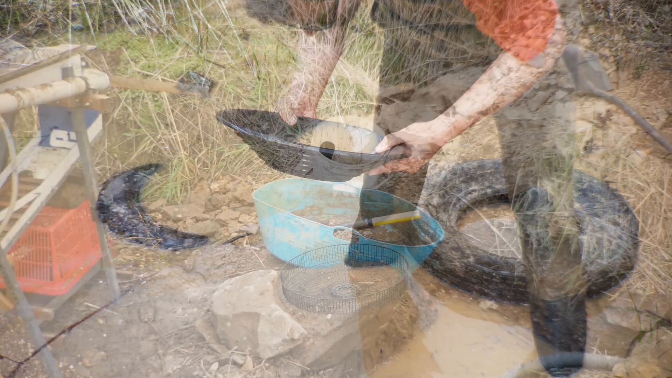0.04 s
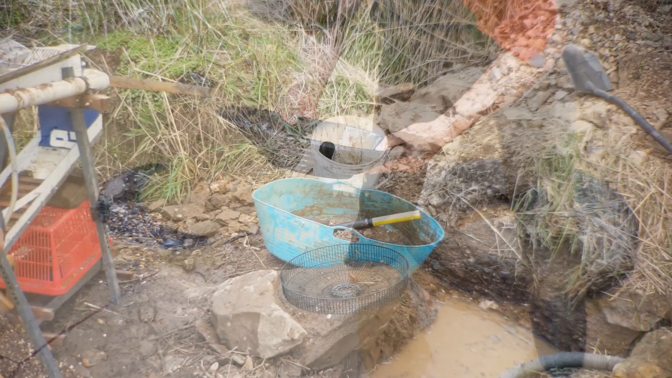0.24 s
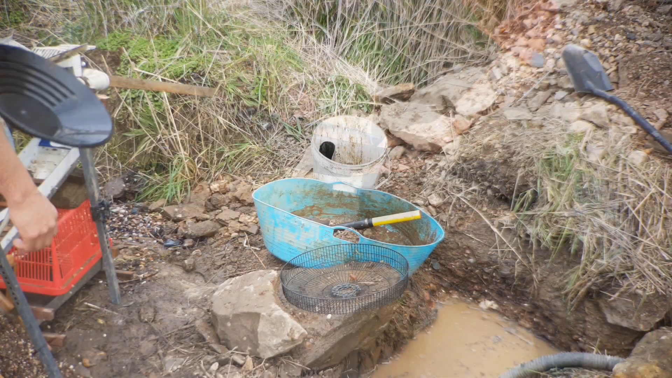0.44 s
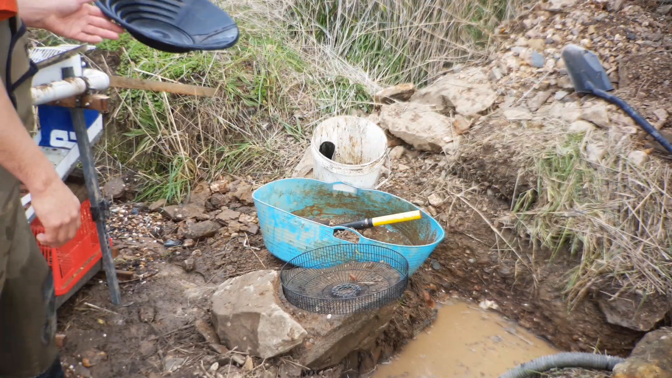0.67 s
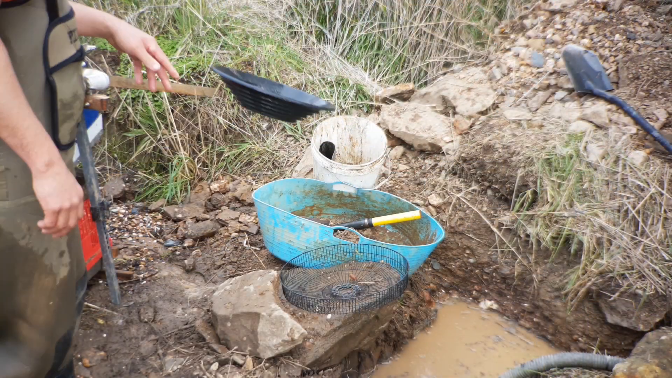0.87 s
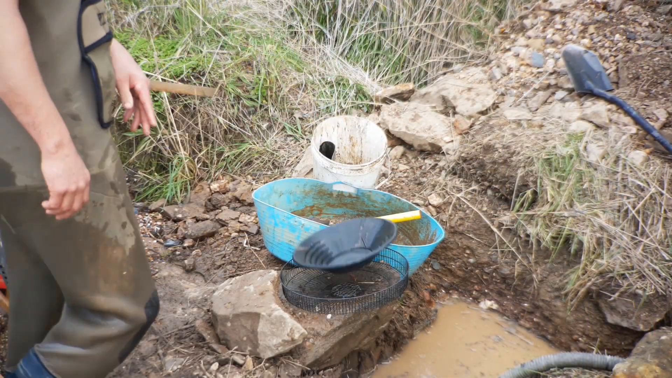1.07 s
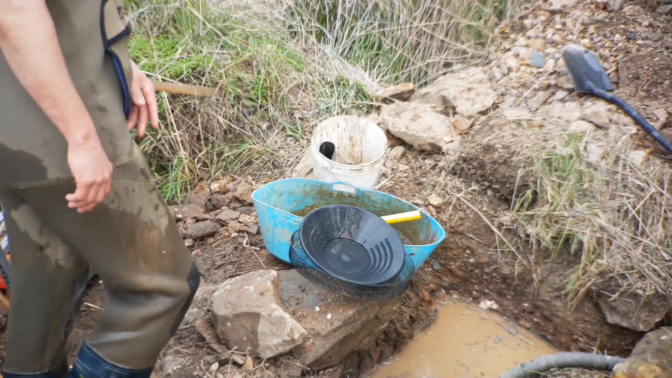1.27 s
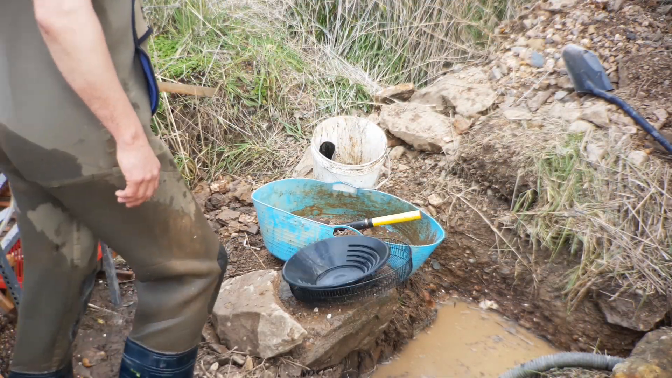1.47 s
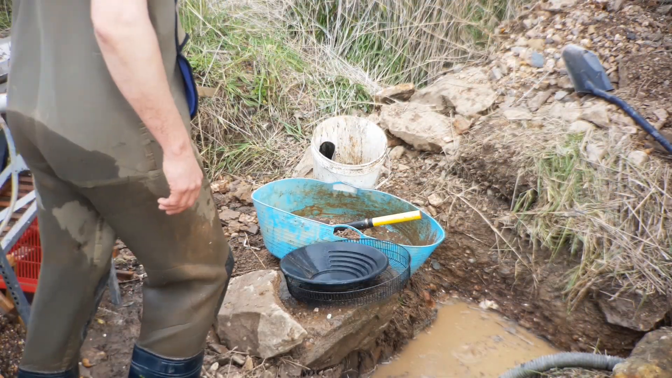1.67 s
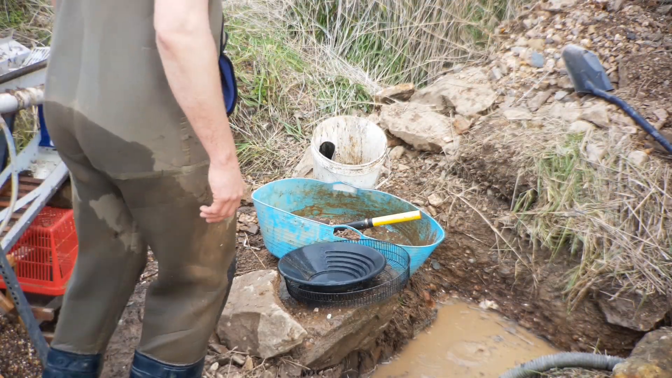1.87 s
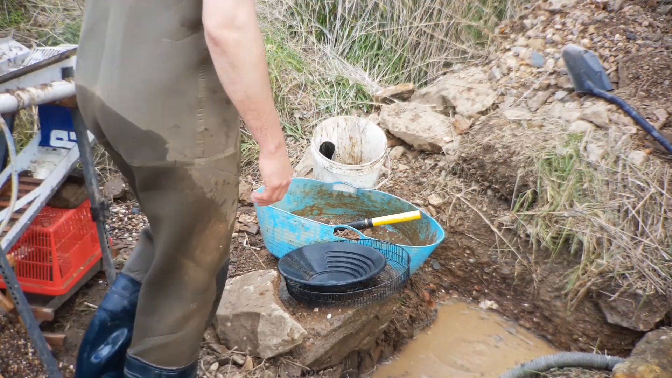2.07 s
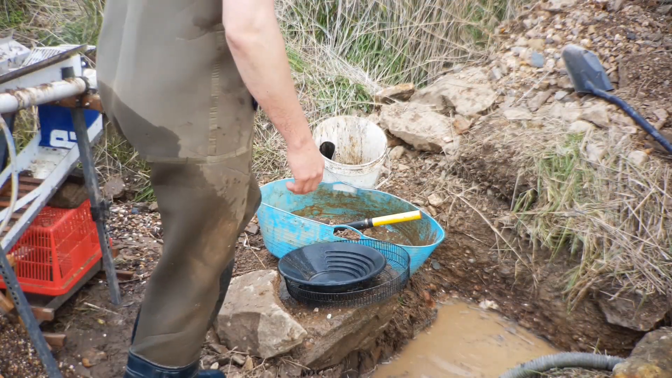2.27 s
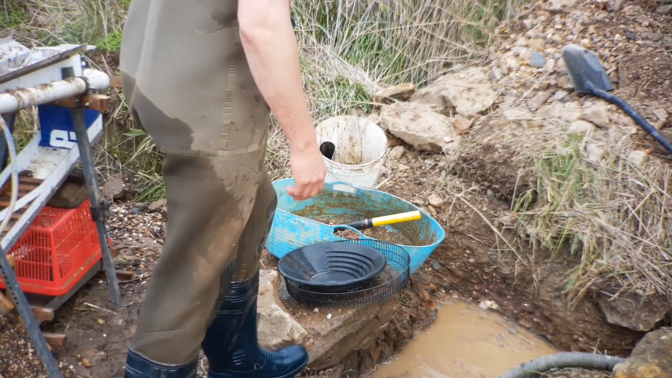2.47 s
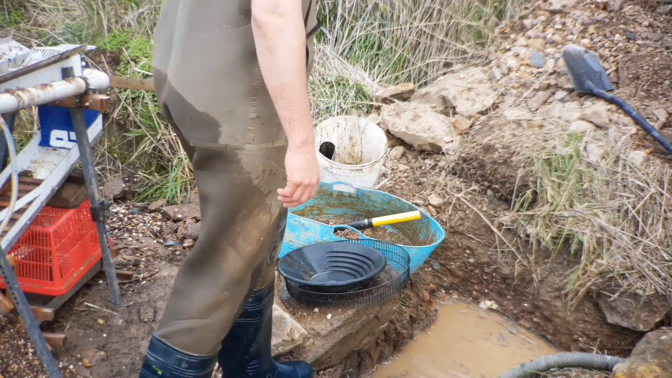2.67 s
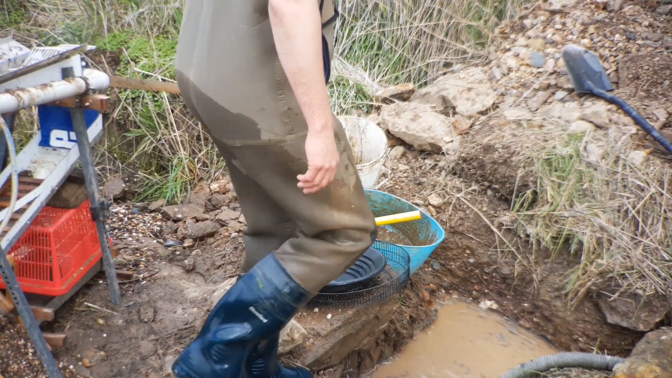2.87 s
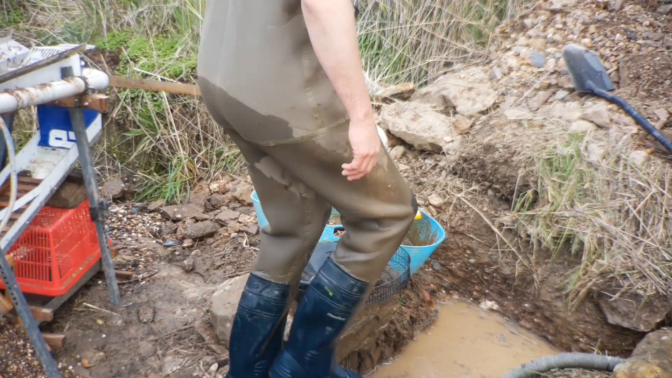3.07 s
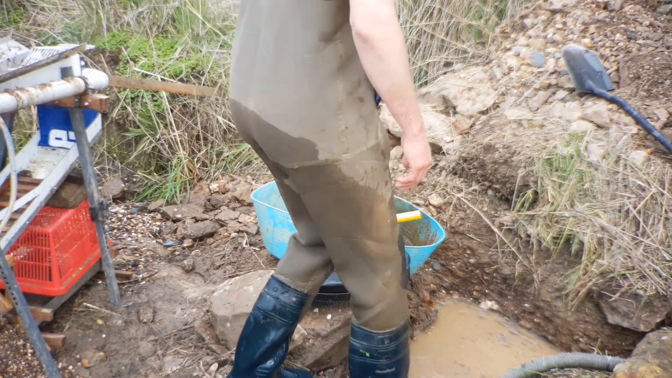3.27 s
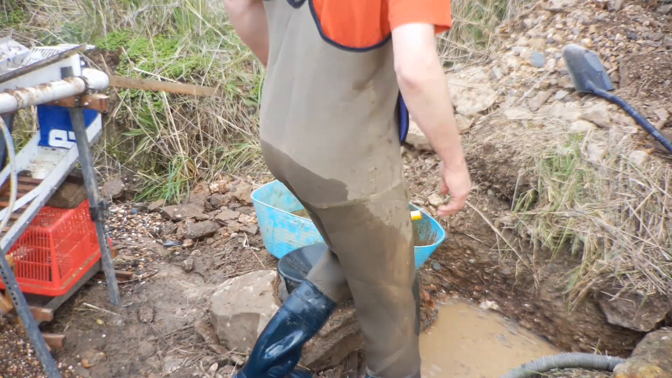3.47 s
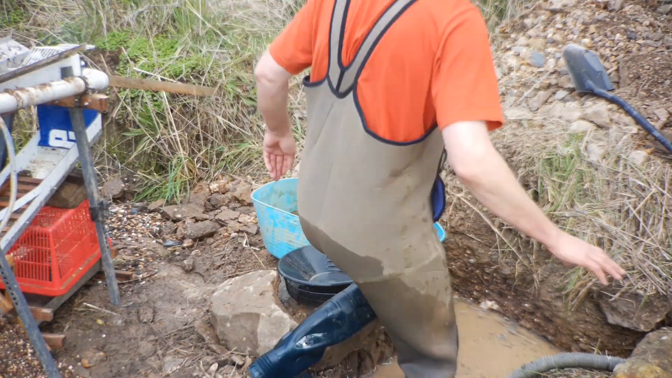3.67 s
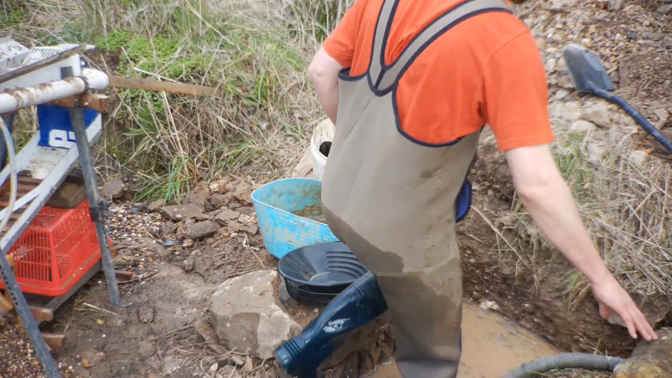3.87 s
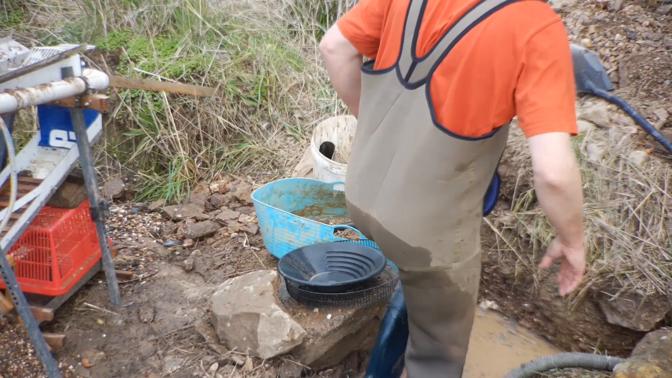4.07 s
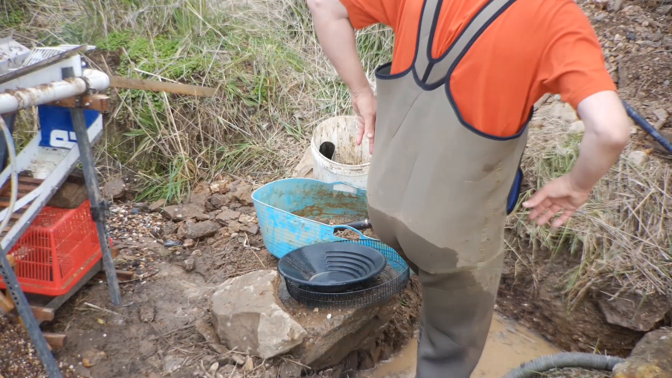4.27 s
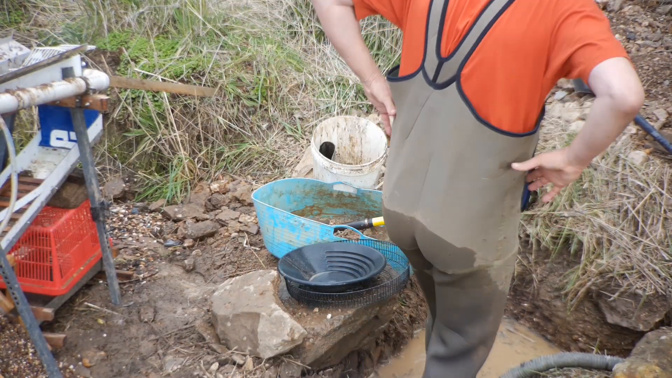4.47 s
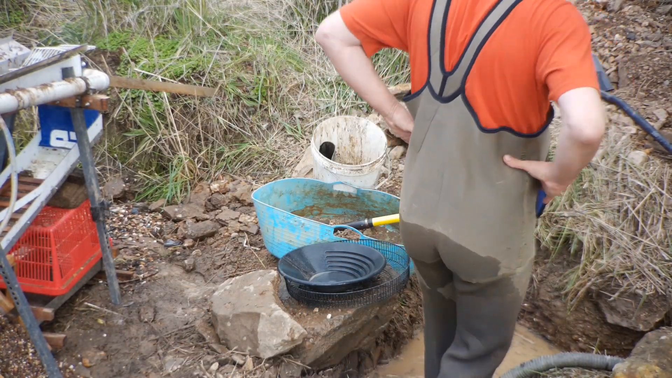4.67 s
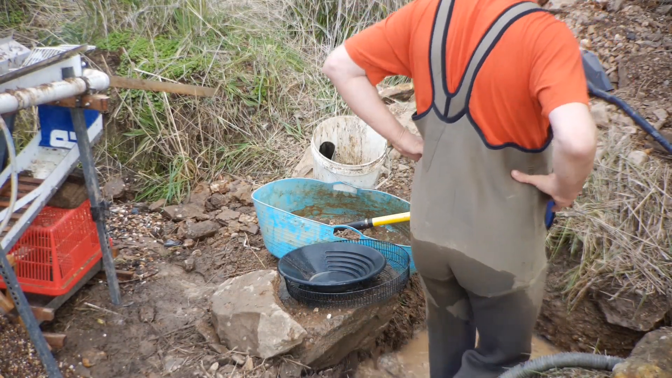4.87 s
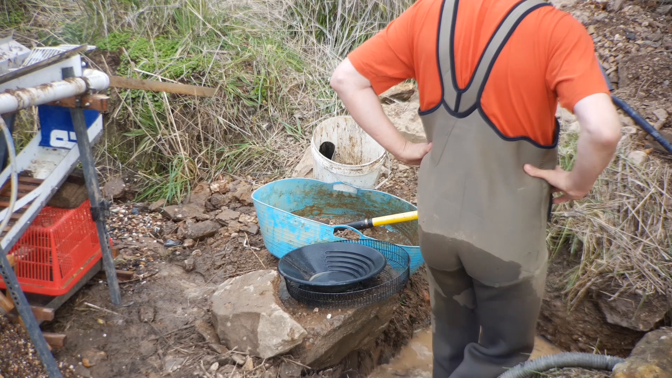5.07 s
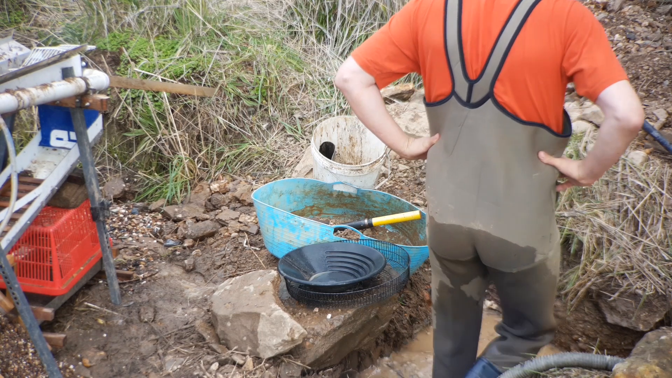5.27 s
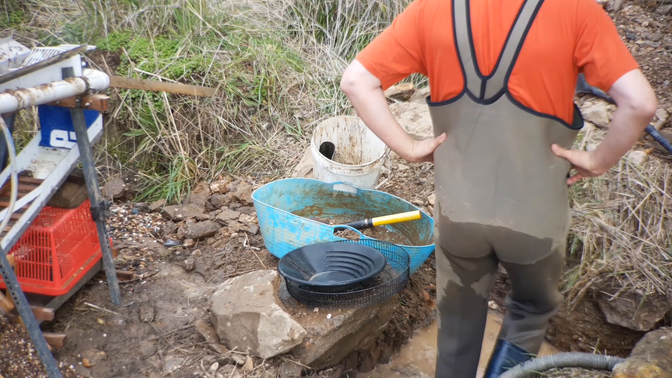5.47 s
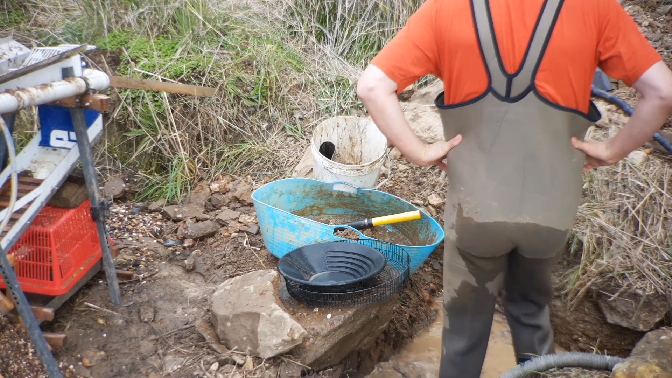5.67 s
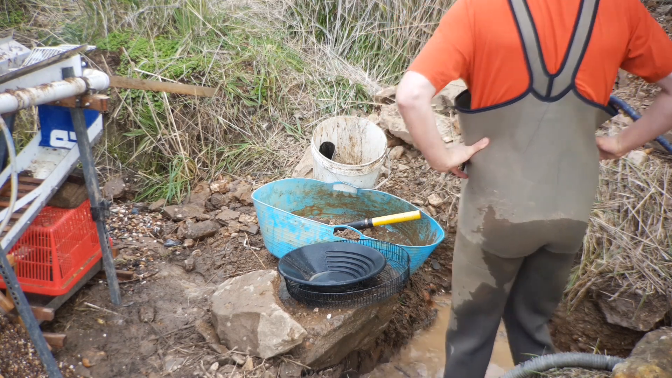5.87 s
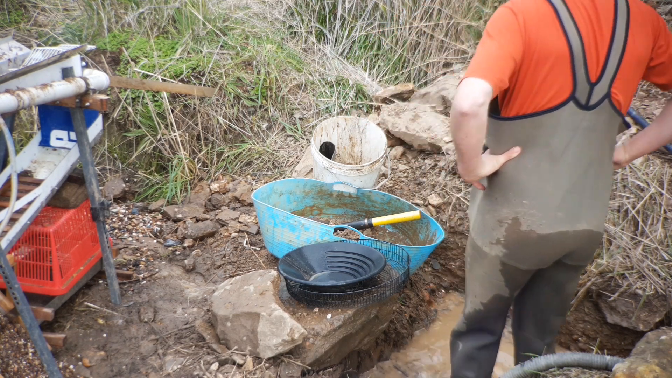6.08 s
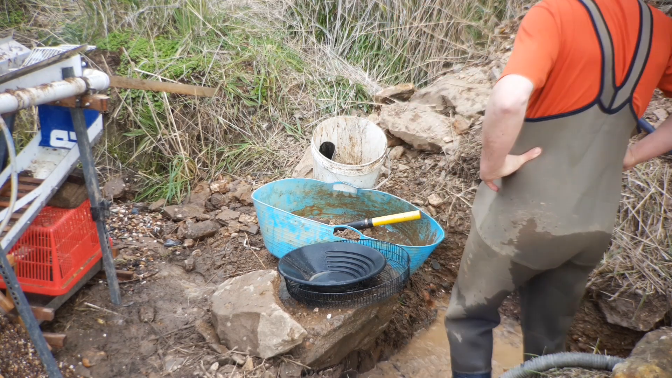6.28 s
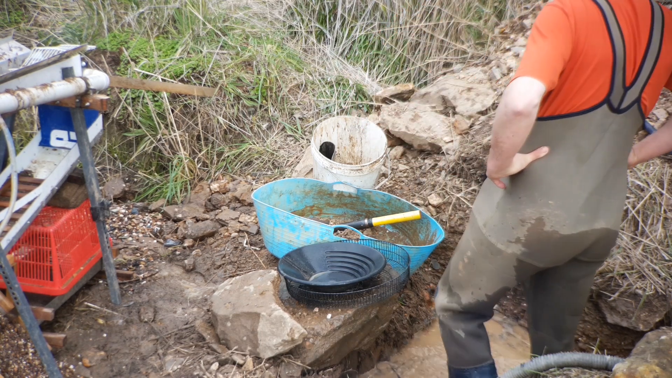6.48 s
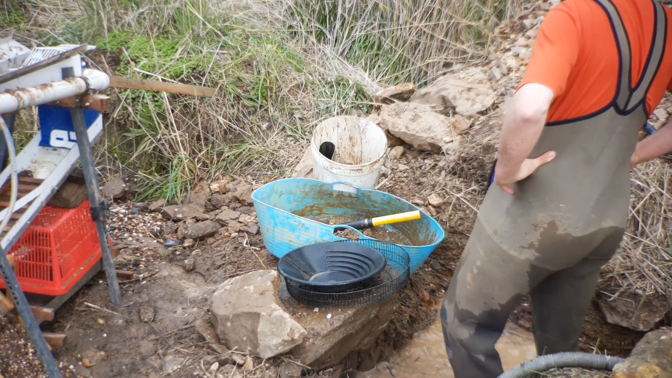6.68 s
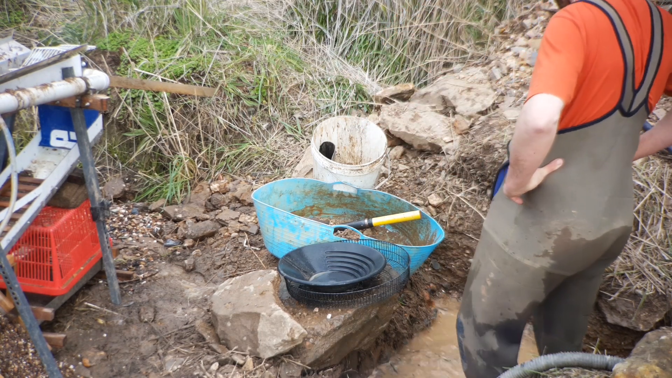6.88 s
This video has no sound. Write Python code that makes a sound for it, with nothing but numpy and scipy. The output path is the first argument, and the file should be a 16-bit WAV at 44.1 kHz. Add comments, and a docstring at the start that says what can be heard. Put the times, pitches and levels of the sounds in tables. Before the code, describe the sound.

A faint bird whistle and a soft boot step come before the loud hollow clack of a plastic pan thrown onto mesh. Quick uneven knocks and fine gravelly rattle die away. Boots shift on the bank, then wade into muddy water with thuds, slosh and trickling drips. A fly passes faintly; a far engine swells late. Recorded close outdoors.

```python
"""Open country hisses faintly, made of shaped noise, under the wavering tones of two far engines. A bird gives
gliding whistles and a rubber boot steps on the bank. Then a plastic pan is tossed onto a wire sieve: each contact
rings its modes and clicks the wire, and filtered grit follows it as it bounces and wobbles to rest. Boots step
again with small noise ticks, then wade into a muddy pool: noise and many short notes make splashes, sloshing,
bubbles and drips. A fly passes as a faint wavering tone."""
import sys
import numpy as np
from scipy import signal
from scipy.fft import rfft, irfft, next_fast_len
from scipy.io import wavfile
from scipy.ndimage import map_coordinates

SR = 44100
rng = np.random.default_rng(int(sys.argv[2]) if len(sys.argv) > 2 else 0)


def materialize(psi):
    """Save the field psi as 16-bit PCM at rate SR to the path in sys.argv[1].

    A 1-D psi becomes a single channel; in a 2-D psi each row is a channel.
    """
    bounded = np.clip(np.atleast_2d(psi).T, -1, 1)
    quanta = np.round(bounded * 32767).astype(np.int16)
    wavfile.write(sys.argv[1], SR, quanta)


N = 306038  # length in samples


def amp(db):
    """Turns decibels into a plain multiplier."""
    return 10 ** (np.asarray(db) / 20)


def unit(x):
    """Scales x to an rms of 1."""
    return x / np.sqrt(np.mean(x ** 2) + 1e-20)


def along(points, hz):
    """Reads (pitch, value) points at any pitch, on a log pitch axis."""
    point_hz, value = np.transpose(points)
    return np.interp(np.log(hz + 1), np.log(point_hz + 1), value)


def curves(rows, outside=None):
    """Draws one curve over time for each column after start_s."""
    start_s, *columns = np.transpose(rows)
    time_s = np.arange(N) / SR
    return [np.interp(time_s, start_s, column, outside, outside) for column in columns]


def wobble(rate):
    """Draws a smooth random curve with rate knots a second."""
    knots = rng.standard_normal(int(N * rate / SR) + 4)
    return map_coordinates(knots, [np.arange(N) * rate / SR])


def filtered(x, response):
    """Multiplies each pitch in x by response(hz)."""
    m = next_fast_len(N + SR // 2)
    hz = np.fft.rfftfreq(m, 1 / SR)
    return irfft(rfft(x, m) * response(hz), m)[..., :N]


def coloured(x, spectrum):
    """Shapes x with a spectrum, then scales it to an rms of 1."""
    return unit(filtered(x, lambda hz: amp(along(spectrum, hz))))


def add(track, start_s, sound):
    """Mixes a short sound into the track."""
    part = track[..., round(start_s * SR):][..., :sound.shape[-1]]
    part += sound[..., :part.shape[-1]]


def tone(hz):
    """Makes a sine wave that follows a pitch curve."""
    return np.sin(2 * np.pi * np.cumsum(hz) / SR)


def bubble(hz, rise, cycles):
    """Makes a soft-started note, as of a trapped bubble: its pitch glides and it dies ever faster."""
    age = np.arange(int(2 * cycles / hz * SR)) * hz / SR / cycles  # 1 = one life
    swell = (1 - np.exp(-age / .08)) ** 2
    fade = np.exp(-1.3 * age - 1.2 * age ** 3)
    return tone(hz * (1 + rise * (age - .3))) * fade * swell


def crackle(per_s, spread_db):
    """Makes sparse clicks of uneven size and random sign."""
    happens = rng.random(N) < per_s / SR
    size = amp(spread_db * rng.standard_normal(N))
    return happens * size * rng.choice([-1, 1], N)


def burst(start_s, length_s, rise_s, t60_s):
    """Draws a loudness curve: rise, hold, then a decay of 60 dB in t60_s."""
    t = np.arange(N) / SR - start_s
    return np.clip(t / rise_s, 0, 1) * amp(-60 * np.clip(t - length_s, 0, None) / t60_s)


# How alike left and right are in near sounds: pitch_hz, likeness (1 = the same)
NEAR_LIKENESS = [(100, .99), (500, .96), (1000, .93), (2000, .85), (4000, .7), (8000, .5)]
# Left against right in near sounds: pitch_hz, left_minus_right_db
NEAR_SIDE = [(60, 1), (150, -1.5), (380, -1.5), (950, -3), (2380, -2), (5980, -7.5), (15000, 4.5)]
# How alike left and right are in far sounds: pitch_hz, likeness (1 = the same)
FAR_LIKENESS = [(70, 0.13), (250, 1), (500, 0.27), (1000, 0.55), (2000, 0.064)]
# Left against right in far sounds: pitch_hz, left_minus_right_db
FAR_SIDE = [(100, 0), (600, -3), (5000, -1), (15000, 0)]


def placed(x, likeness, side, lag_s, size):
    """Two ports hear x and an ever-changing scattered copy; the left port lags and has its own tilt."""
    z = signal.stft(x, nperseg=size)[2]
    scrambled = z * np.exp(2j * np.pi * rng.random(z.shape))
    copy = np.sqrt(2) * signal.istft(scrambled, nperseg=size)[1][:N]

    def mix(hz):
        turn = np.arccos(np.clip(along(likeness, hz), -1, 1)) / 2
        return np.array([np.cos(turn), np.sin(turn)])

    def ports(hz):
        half = np.array([[.5], [-.5]])  # half the difference goes to each port
        delay = np.exp(-1j * half * (.22 + 2 * np.pi * hz * lag_s))  # a fixed turn of .22 rad, plus the lag
        return amp(along(side, hz) * half) * delay

    mid, rest = filtered(np.array([x, copy]), mix)
    return filtered(np.array([mid + rest, mid - rest]), ports)


# Colour of the far hiss: pitch_hz, level_db (per Hz, relative)
AIR_COLOUR = [(20, -10), (45, -1), (110, -4), (250, -13.5), (1000, -15), (2000, -20), (3000, -24.5),
              (4200, -31.5), (9000, -38), (11300, -37), (12300, -33.5), (15800, -33)]


def air():
    """Far traffic and leaves, over the microphone's own hiss: one shaped noise whose level drifts."""
    level_db = -64 + 1.4 * wobble(5.2)
    return amp(level_db) * coloured(rng.standard_normal(N), AIR_COLOUR)


# A far engine idling: start_s, level_db (before its wobble)
IDLE = [(0, -64), (1.9, -70), (4.7, -69), (4.95, -69), (5.3, -81.5)]
# A second engine that drives about: start_s, pitch_hz, level_db (both before their wobble)
PASSING = [(0, 72.88, -67.5), (1.1, 74.5, -61.5), (2, 71.74, -71), (3.4, 70.5, -96), (4.8, 71, -83.5),
           (4.95, 73.23, -62), (5.4, 66.98, -57.5), (6, 71.9, -51.5), (6.5, 70.45, -52),
           (6.94, 71.9, -56.5)]


def drone():
    """Two unsteady engine notes beat against each other; each has a weak octave."""
    idle_db, = curves(IDLE)
    passing_hz, passing_db = curves(PASSING)
    notes = [(65.5 + 1.2 * wobble(20.0), idle_db + 4.4 * wobble(14)),
             (passing_hz + 1.6 * wobble(24.0), passing_db + 1.3 * wobble(40))]
    return sum(amp(db) * (tone(hz) + 0.049 * tone(2 * hz)) for hz, db in notes)


# A far bird's whistles: start_s, length_s, start_hz, middle_hz, end_hz, level_db (9 dB is added below)
WHISTLES = [(0.32, .032, 5900, 5450, 4400, -84), (0.478, .04, 2650, 3040, 2770, -76.5),
            (0.566, 0.06, 3000, 3250, 2780, -80)]


def bird():
    """Short pure whistles glide through three pitches, each swelling and fading."""
    song = np.zeros(N)
    for start_s, length_s, *hz, level_db in WHISTLES:
        u = np.linspace(0, 1, round(length_s * SR))
        glide_hz = np.interp(u, [0, .5, 1], hz)
        add(song, start_s, amp(level_db + 9.0) * np.sin(np.pi * u) * tone(glide_hz))
    return song


# A boot lands or pushes, first on the bank, then in the pool: start_s, length_s, low_push_db, spray_db
STEPS = [(0.688, 0.025, -52, -67), (2.63, 0.036, -72.5, -70.5), (2.746, 0.12, -61, -72.5),
         (3.546, 0.017, -50.5, -46.5), (3.595, 0.05, -51, -64.5), (3.751, 0.025, -76, -61),
         (3.822, 0.031, -52, -69), (4.354, 0.024, -63.5, -50), (6.157, 0.081, -75, -59.5),
         (6.454, 0.044, -65, -70)]
# The pool sloshing round the legs: start_s, level_db
SLOSH = [(3.3, -102), (3.45, -64), (3.66, -60.5), (3.74, -58), (3.9, -53.5), (4.02, -60), (4.2, -61.5),
         (4.35, -66), (4.55, -70), (5.2, -81.5), (5.3, -65.5), (5.6, -60), (5.77, -57.5), (5.9, -62),
         (6.04, -58), (6.28, -60), (6.33, -65.5), (6.55, -68.5), (6.94, -79)]


def steps_and_slosh():
    """Boots and sloshing set two loudness curves: the low push and the quicker-fading spray."""
    rise_s, push_t60_s, spray_t60_s = 0.0046, 0.2, 0.12
    slosh_db, = curves(SLOSH, -120)
    push = amp(slosh_db)
    throw = amp(slosh_db - 7)
    for start_s, length_s, push_db, spray_db in STEPS:
        push = push + amp(push_db) * burst(start_s, length_s, rise_s, push_t60_s)
        throw = throw + amp(spray_db) * burst(start_s, length_s, rise_s, spray_t60_s)
    return push, throw


# Colour of the low gurgle: pitch_hz, level_db (per Hz, relative)
GURGLE_COLOUR = [(59, -37), (100, -14.5), (161, -5), (256, -6), (366, -11), (829, -11), (1420, -10.5),
                 (2370, -14), (4000, -26.5), (5200, -71)]


def gurgle(push):
    """Pushed water gurgles: rough noise throughout, joined by many small bubbles in the pool."""
    swarm = np.zeros(N)
    for when, pitch, size, life in rng.random((2100, 4)):
        hz = 420 * 8 ** pitch
        note = bubble(hz, .1 * life, 5 + 14 * life ** 2)
        add(swarm, 3.44 + 3.5 * when, hz ** .45 * amp(13 * size) * note)  # the boots are in the pool
    rough = rng.standard_normal(N) + 3 * crackle(830, spread_db=4.0)
    churn = coloured(rough, GURGLE_COLOUR) * amp(2 * wobble(60))
    return push * amp(1.2 * wobble(25)) * (.65 * coloured(swarm, GURGLE_COLOUR) + .48 * churn)


# Colour of the bright spray: pitch_hz, level_db (per Hz, relative)
SPRAY_COLOUR = [(1180, -18.5), (2000, -5), (2660, -4.5), (3060, -8), (4390, -14.5), (7980, -13.5),
                (9240, -22.5), (14400, -21.5), (15800, -29.5)]


def spray(throw):
    """Thrown water sprays as bright noise, with clicks for drops and a flickering level."""
    drops = rng.standard_normal(N) + 4 * crackle(300, spread_db=5)
    return throw * amp(3.2 * wobble(47)) * coloured(drops, SPRAY_COLOUR)


# A boot sole meets the mud: start_s, level_db (6.5 dB is added below), pitch_hz
THUDS = [(0.693, -56.5, 169), (3.551, -44.5, 179), (3.625, -39.5, 165), (3.762, -41.5, 320),
         (3.837, -34, 405), (4.155, -55, 362), (4.914, -52, 189), (6.12, -44.5, 159), (6.188, -49, 155)]


def thuds():
    """Each sole gives a low note that dies within a few cycles."""
    track = np.zeros(N)
    for start_s, level_db, pitch_hz in THUDS:
        add(track, start_s, amp(level_db + 6.5) * bubble(pitch_hz, 0.051, 2.7))
    return track


# Pan contacts: start_s, level_db (8 dB is taken off the bowl), bowl_boom_db (2 dB is added), wire_click_db
KNOCKS = [(1.1291, -23, 2.5, -7.5), (1.1349, -14, -12, -7), (1.1451, -18.5, -15, -21),
          (1.15, -13, -6, -10.5), (1.1569, -21, -19, -18.5), (1.1979, -20, -27, -20.5),
          (1.263, -41, 0, -28.5), (1.337, -38, 10, -25), (1.3424, -25, -2.5, -13),
          (1.3729, -20.5, 2, -24.5), (1.3776, -26.5, -4, -28), (1.426, -26, 3, -14.5),
          (1.462, -46.5, 16, -25), (1.4887, -20.5, -26, -12.5), (1.511, -26.5, -7, -18),
          (1.5304, -28, -5, -0.5), (1.5375, -25, -20, -9), (1.5763, -29, -20, -15),
          (1.5852, -28, -8.5, -2.5), (1.6311, -32.5, -20, -25), (1.6391, -34.5, -13, -10.5),
          (1.665, -33, -4, -24), (1.679, -28.5, 1, -4.5), (1.688, -35.5, -6, -6.5),
          (1.6948, -32.5, -7, -14.5), (1.7171, -41, -6, -37.5), (1.743, -41, -1, -20.5),
          (1.758, -37, -1, -29), (1.7762, -35, 6, -18.5), (1.823, -50.5, 10, -16.5)]
# Ringing modes of the pan: pitch_hz, level_db (relative), t60_s (time to fall 60 dB)
PAN_MODES = [(233, -5.5, 0.058), (391.6, -4, .058), (552, -0.5, 0.035), (644.6, -7.5, 0.048),
             (770, -5, 0.07), (888.4, -7, 0.074), (1070, -3.5, 0.04), (1280, -3.5, 0.037),
             (1540, 1.5, 0.011), (1845, -3.5, 0.03), (2130, -11.5, 0.032), (2600, -2, 0.013),
             (3287, -10.5, 0.017), (3800, -22.5, 0.055)]
# Colour of the wire clicks: pitch_hz, level_db (per Hz, relative)
WIRE_COLOUR = [(1200, -39), (2500, 2), (3700, 3.5), (4800, -0.5), (7700, 7.5), (10000, -2.5), (15800, -9.5)]


def pan_knocks():
    """Each contact rings the pan's modes at new strengths, with a dry clack and a click on the wire."""
    # the ribbed bowl splits each mode into a close cluster of three
    hz, level_db, t60_s = np.repeat(PAN_MODES, 3, axis=0).T[:, :, None]
    t = np.arange(SR // 6) / SR
    bowl, clicks, clacks = np.zeros((3, N))
    for start_s, knock_db, boom_db, click_db in KNOCKS:
        size, detune, phase = rng.standard_normal((3, *hz.shape))
        strength = amp(level_db + (boom_db + 2) * (hz < 600) + 2 * size)
        ring = np.sin(2 * np.pi * (hz * (1 + 0.035 * detune) * t + phase))
        ring *= strength * amp(-60 * t / t60_s)
        ring *= 1 - np.exp(-t * hz / 0.27)  # each mode builds within half a cycle
        add(bowl, start_s, amp(knock_db - 8.0) * ring.sum(0))
        add(clacks, start_s, amp(knock_db - 6 - 60 * t / .016) * rng.standard_normal(len(t)))
        snap = amp(-60 * t / .007) + .06 * amp(-60 * t / .05)  # the wire shivers on after the click
        add(clicks, start_s, amp(knock_db + click_db) * snap * rng.standard_normal(len(t)))
    clack_hz = 2300  # middle of the band that the clacks pass through
    bowl = bowl + filtered(clacks, lambda f: 1j * f * clack_hz / (clack_hz ** 2 - f * f + 1j * f * clack_hz))
    # the sieve is driven down on its stone at the landing
    add(bowl, LANDING_S, amp(-24) * bubble(107, 0, 2.8))
    echo_t = np.arange(SR // 8) / SR
    echo = rng.standard_normal(SR // 8) * amp(-60 * echo_t / 0.11)  # stones and bank scatter it back
    scatter = signal.fftconvolve(bowl, echo / np.linalg.norm(echo))[:N]
    wire = 1.48 * filtered(clicks, lambda f: amp(along(WIRE_COLOUR, f)))
    return bowl + amp(-13.5) * scatter + wire


LANDING_S = 1.135
# The rim rolling on the mesh as the pan wobbles to rest: start_s, level_db, bowl_boom_db (low against high)
ROLL = [(1.33, -64.5, 5), (1.39, -44.5, 2), (1.465, -43.5, 9), (1.52, -40, -4.5), (1.62, -46, 6),
        (1.7, -44, -3.5), (1.73, -48, 3.5), (1.85, -52.5, -2), (2.0, -72, 6)]
# Colour of the shaken mesh: pitch_hz, level_db (per Hz, relative)
MESH_COLOUR = [(1200, -36), (2500, 5), (4800, -4), (7700, -0.5), (9700, -7), (12000, -1.5), (15800, -7)]


def pan_rolling():
    """After the landing, pan and mesh shudder; the rolling rim then keeps both astir with fine grit."""
    roll_db, boom_db = curves(ROLL, -120)
    quick_fall = burst(LANDING_S, 0.0082, 0.014, 0.14)
    slow_fall = amp(-10) * burst(LANDING_S, 0.029, 0.01, 0.66)
    shudder = amp(-33) * (quick_fall + slow_fall)
    rim = amp(roll_db) + shudder
    # the wire is 12 dB under the rim at -45 dB, and swings wider than the rim
    mesh = amp(-45 - 12 + 1.8 * (roll_db + 45)) + amp(-3.5) * shudder

    def rubbed(f):
        modes = sum(amp(db) * 1j * f * 2.2 / (hz * hz - f * f + 1j * f * 3.9 / t60_s)
                    for hz, db, t60_s in PAN_MODES)
        return modes / (1 + 1j * f / 1100) ** 2  # a soft contact stirs only the low modes

    grit = crackle(1000, spread_db=4.5)
    low, high = filtered(grit, lambda f: rubbed(f) * np.array([f < 600, f >= 600]))
    # the travelling contact favours now the deep, now the bright modes
    lean = amp(np.where(roll_db > -120, boom_db, 0) / 2)
    rolling = rim * (lean * unit(low) + unit(high) / lean) / np.sqrt(2)
    shaken = rng.standard_normal(N) + 5.0 * crackle(400, spread_db=1.5)
    return rolling + mesh * coloured(shaken, MESH_COLOUR)


# Grit and droplets tick: start_s, level_db (before the filter and gain below)
TICKS = [(2.7528, -52.5), (2.7949, -52), (3.274, -62.5), (3.332, -57.5), (3.5638, -45.5), (5.5478, -53),
         (6.0757, -50), (6.138, -53), (6.2016, -47)]


def ticks():
    """Each tick is a very short noise with the colour of spray."""
    track, t = np.zeros(N), np.arange(SR // 50) / SR
    for start_s, level_db in TICKS:
        add(track, start_s, amp(level_db - 60 * t / .006) * rng.standard_normal(len(t)))
    return 6 * filtered(track, lambda hz: amp(along(SPRAY_COLOUR, hz)))


# Single bubbles and drips, and a few low, longer-ringing boot thuds in the mud: start_s, level_db, pitch_hz,
# pitch_rise (share of pitch), life_cycles (at least 2 used)
DRIPS = [(3.445, -42, 1850, 0.013, 7.5), (3.561, -31, 640, 0.12, 3.1), (3.601, -38.5, 790, 0.48, 14),
         (3.681, -43, 492, -0.053, 21), (3.752, -41, 1766, 0.01, 28), (3.768, -42.5, 927, 0.11, 17),
         (3.848, -37.5, 489, 0.51, 11), (3.852, -39.5, 805, .08, 23), (4.189, -42, 734, 0.027, 10),
         (4.272, -39.5, 1480, .02, 17.6), (4.36, -37, 2530, 0.34, 11), (4.376, -43.5, 405, 0.11, 7.3),
         (4.503, -44.5, 2830, -0.26, 21), (4.554, -51, 1140, 0.2, 15), (4.581, -54, 1270, .12, 16),
         (4.632, -57.5, 993, 0.0037, 30), (4.712, -42, 1325, 0.4, 26.5), (4.734, -52, 1520, 0.15, 21),
         (4.827, -57, 1397, 2.16, 36), (4.843, -48.5, 185, -0.2, 7.8), (4.979, -51.5, 2840, -0.022, 34),
         (5.08, -45.5, 1657, .1, 22), (5.264, -49, 1760, -0.26, 14), (5.346, -51.5, 2580, -0.056, 26),
         (5.386, -47.5, 327, 0.11, 13), (5.429, -51, 1116, -0.03, 14), (5.517, -52, 940, -0.16, 29),
         (5.548, -55.5, 4660, -0.054, 42), (5.552, -46.5, 730, 0.28, 14.5), (5.656, -50, 780, -0.099, 28),
         (5.735, -48, 1160, -0.013, 18), (5.773, -43, 241, -0.08, 10.7), (6.018, -46, 1760, -0.045, 17),
         (6.344, -52.5, 1150, -0.078, 18), (6.477, -47, 574, 0.23, 8.2), (6.483, -46, 1330, 1, 16.5),
         (6.665, -40.5, 1670, 0.25, 11), (6.666, -45, 2800, -0.31, 15), (6.667, -47, 1240, 0.43, 12)]


def drips():
    """Each drip, or low thud, breaks the surface with a snap of noise and rings a note, with three more bubbles
    around it."""
    notes, snaps, t = np.zeros(N), np.zeros(N), np.arange(SR // 50) / SR
    for start_s, level_db, pitch_hz, rise, cycles in DRIPS:
        add(snaps, start_s, amp(level_db - 60 * t / .05) * rng.standard_normal(len(t)))
        add(notes, start_s, amp(level_db) * bubble(pitch_hz, rise, max(cycles, 2)))
        for late, pitch, size in rng.random((3, 3)):  # smaller and larger bubbles break with it
            extra = bubble(pitch_hz * 4 ** (pitch - .5), .1, cycles / 2)
            add(notes, start_s + late * .014, amp(level_db - 5.5 - 10.5 * size) * extra)
    return notes + 1.3 * filtered(snaps, lambda hz: amp(along(GURGLE_COLOUR, hz)))


# Wingbeat of a fly: start_s, pitch_hz (before its wobble), level_db (4 dB and a wobble are added below)
FLY = [(3.85, 215.5, -90.5), (3.95, 214.7, -71), (4.7, 211.6, -77.5), (4.95, 246, -75.5), (5.1, 268, -78.5),
       (5.5, 272.7, -65), (5.7, 254, -102), (5.9, 240, -68.5), (6.1, 227.5, -82)]


def fly():
    """A faint wingbeat tone wavers in pitch and level."""
    pitch_hz, level_db = curves(FLY)
    return amp(level_db + 4 + 2.5 * wobble(12)) * tone(pitch_hz * (1 + .008 * wobble(15)))


def scene():
    """Places the far sounds, the engines, the water and the pan between left and right, and adds them up."""
    far = placed(air() + bird() + fly(), FAR_LIKENESS, FAR_SIDE, lag_s=3.5e-4, size=2048)
    engines = placed(drone(), NEAR_LIKENESS, FAR_SIDE, lag_s=1e-4, size=8192)
    push, throw = steps_and_slosh()
    water = gurgle(push) + spray(throw) + thuds() + ticks() + drips()
    water = placed(water, NEAR_LIKENESS, NEAR_SIDE, lag_s=6e-5, size=256)
    pan = placed(pan_knocks() + pan_rolling(), NEAR_LIKENESS, NEAR_SIDE, lag_s=1.2e-5, size=128)
    return far + engines + water + pan


def record(dry):
    """The microphone weakens the deepest bass (below about 30 Hz) and keeps nothing from 15900 Hz up."""
    return filtered(dry, lambda hz: (hz < 15900) * 1j * hz / (30 + 1j * hz))


dry = scene()
out = record(dry)
materialize(out)
```